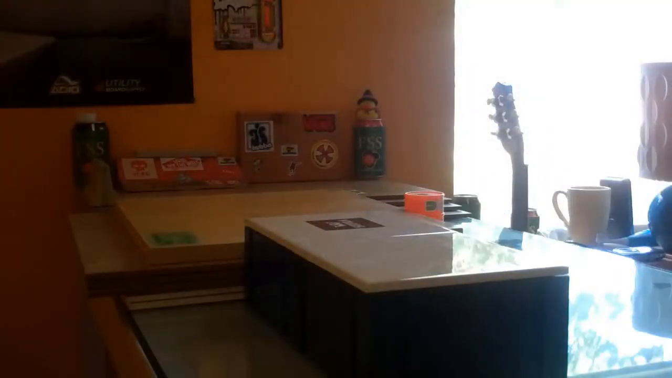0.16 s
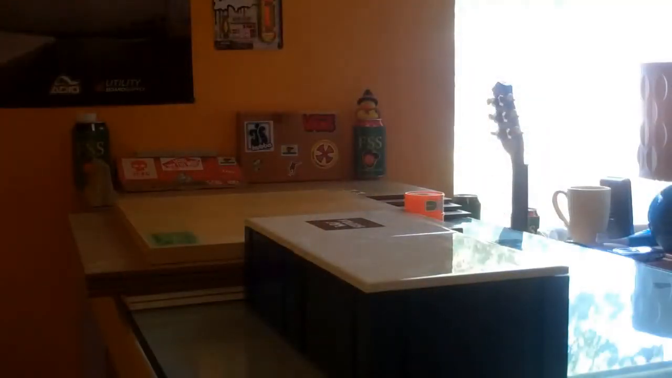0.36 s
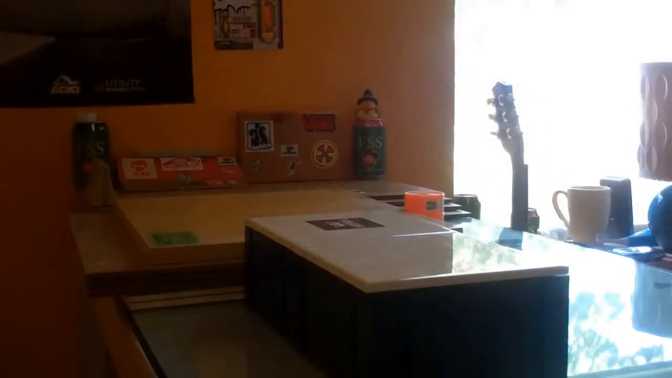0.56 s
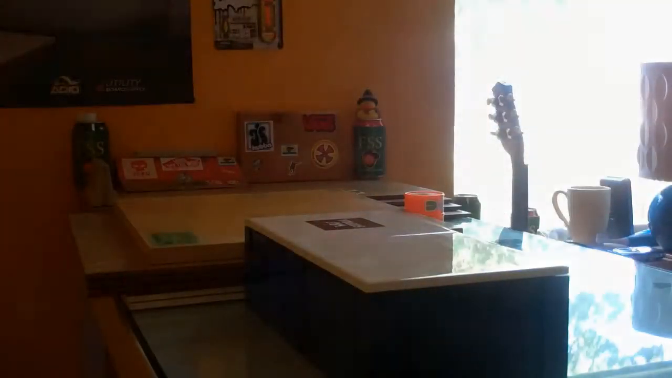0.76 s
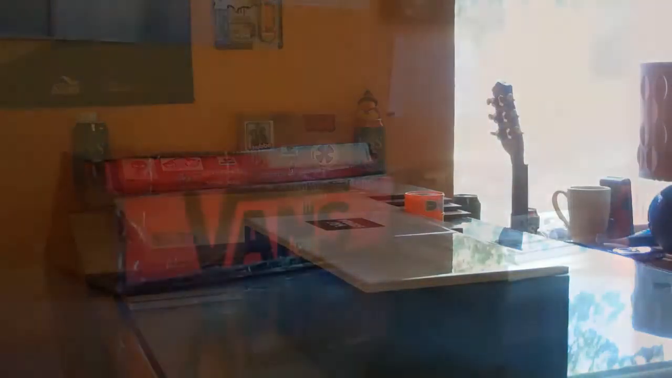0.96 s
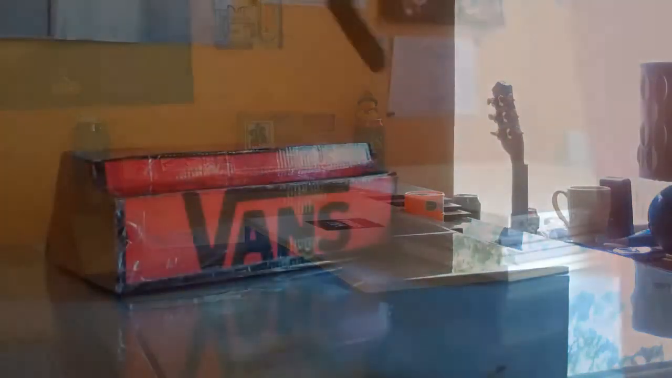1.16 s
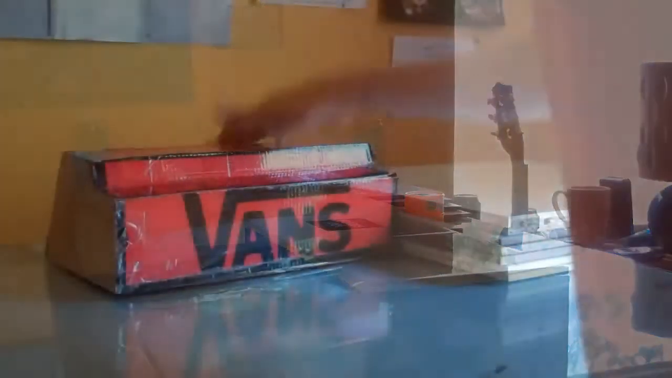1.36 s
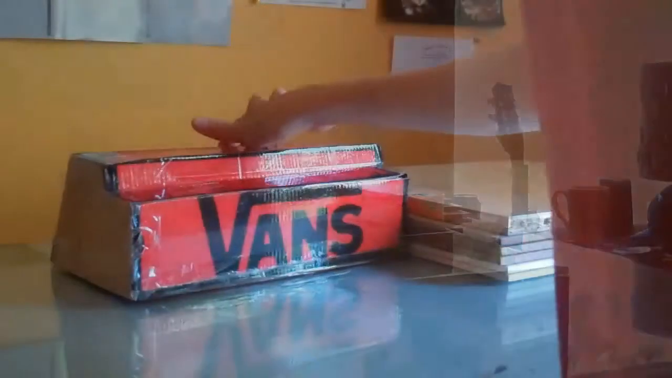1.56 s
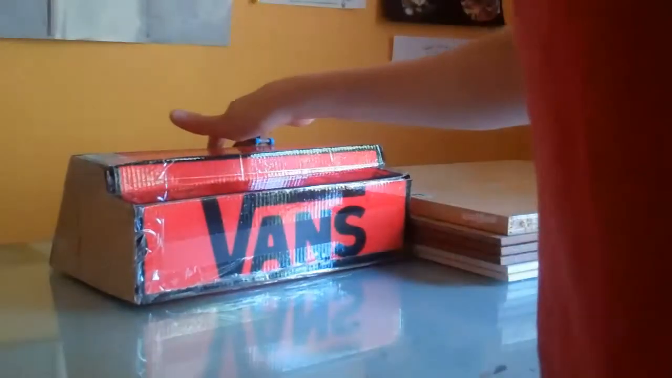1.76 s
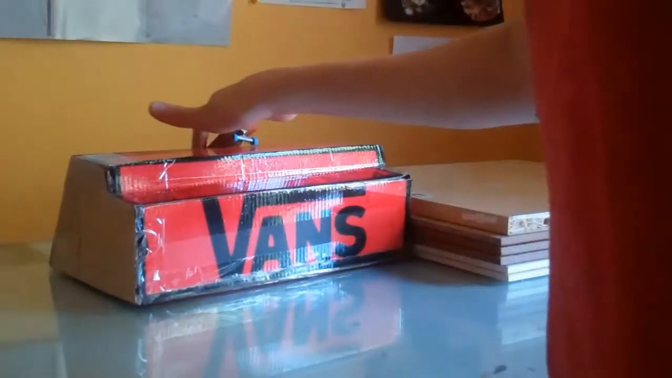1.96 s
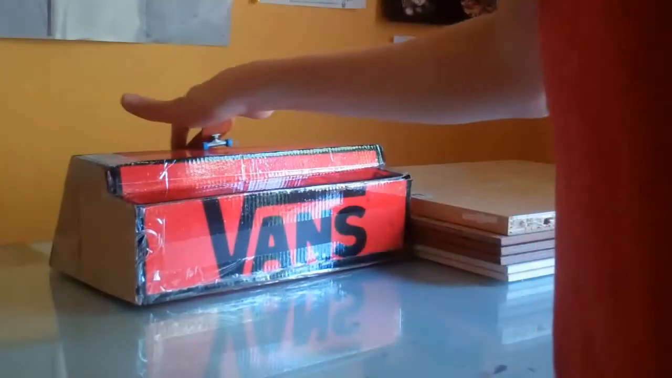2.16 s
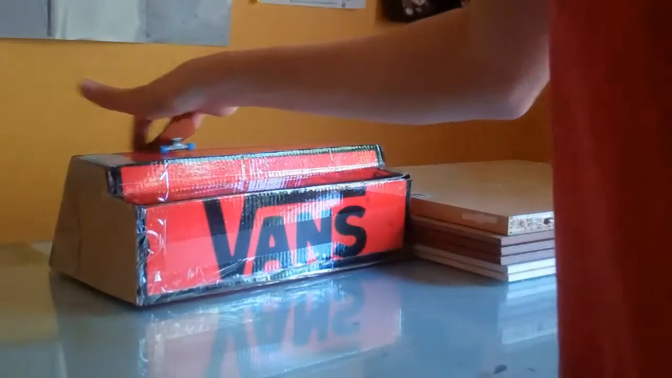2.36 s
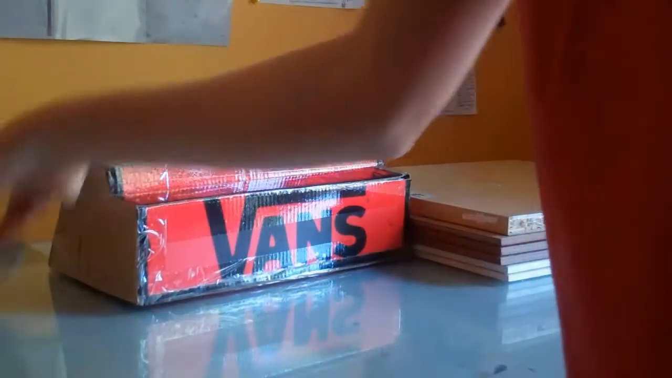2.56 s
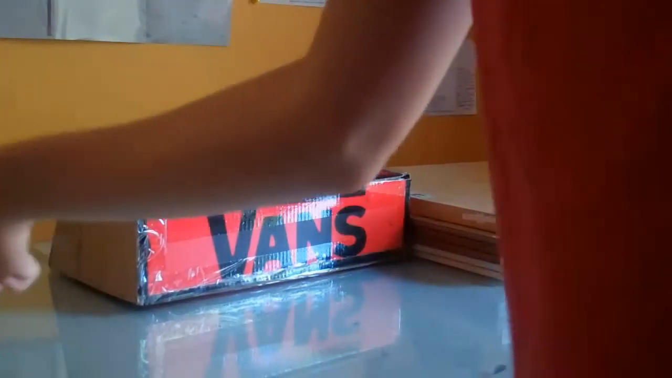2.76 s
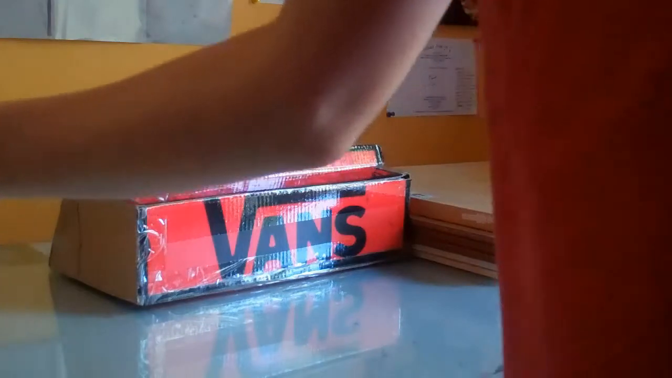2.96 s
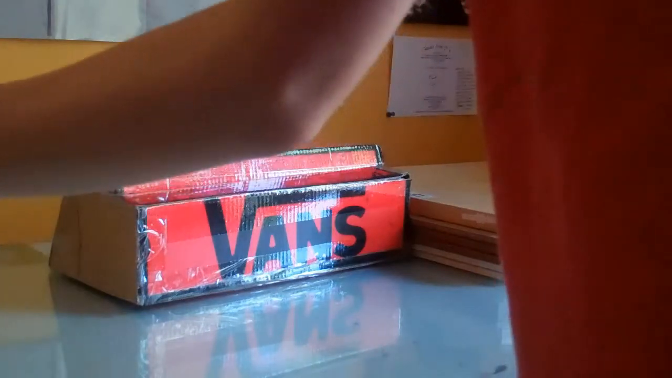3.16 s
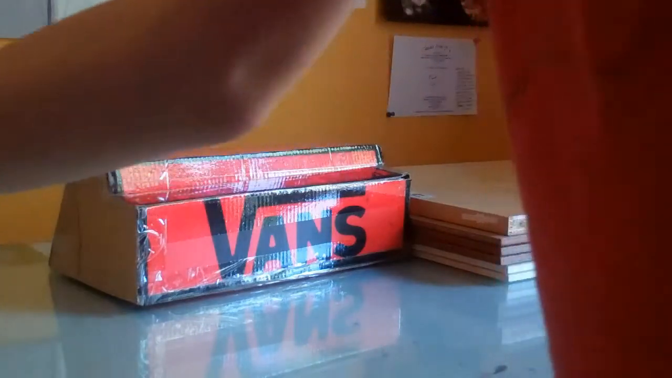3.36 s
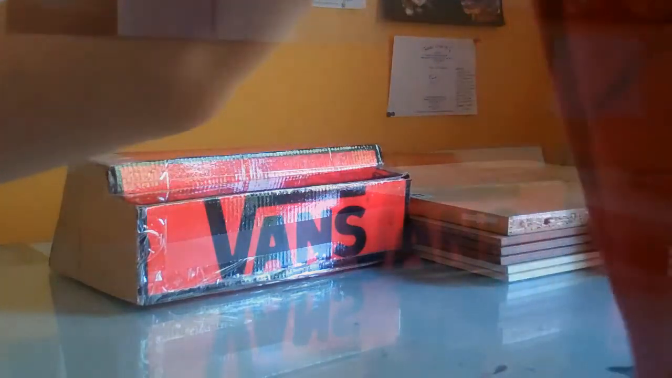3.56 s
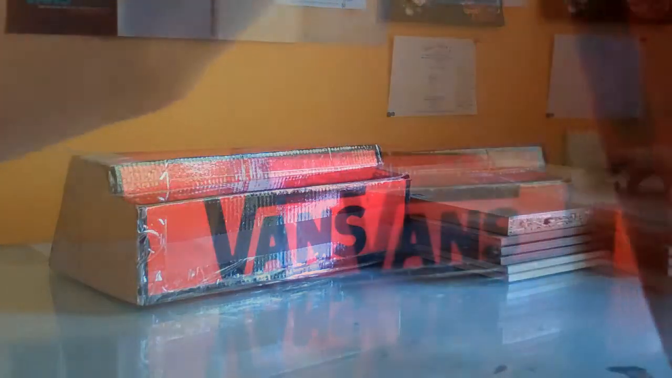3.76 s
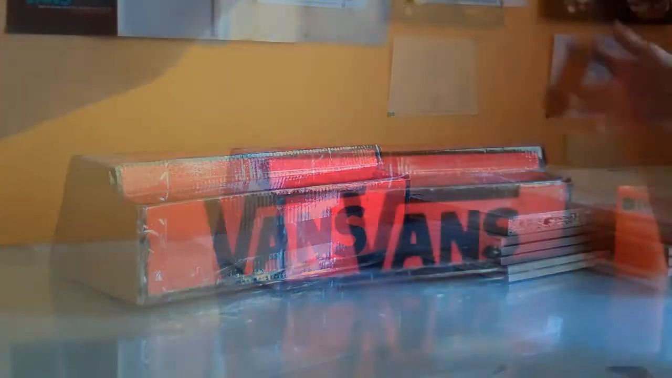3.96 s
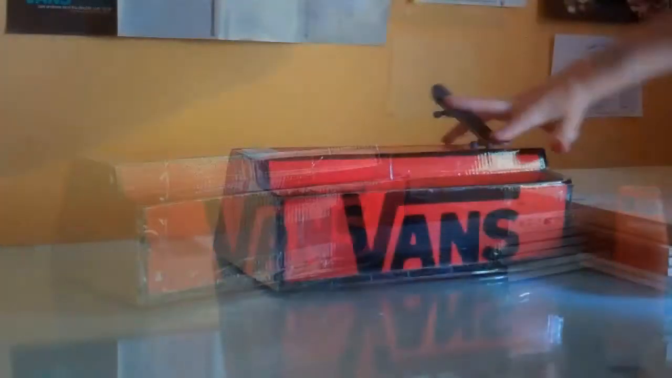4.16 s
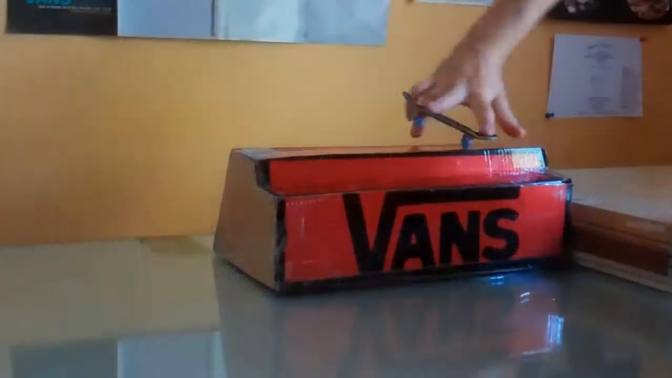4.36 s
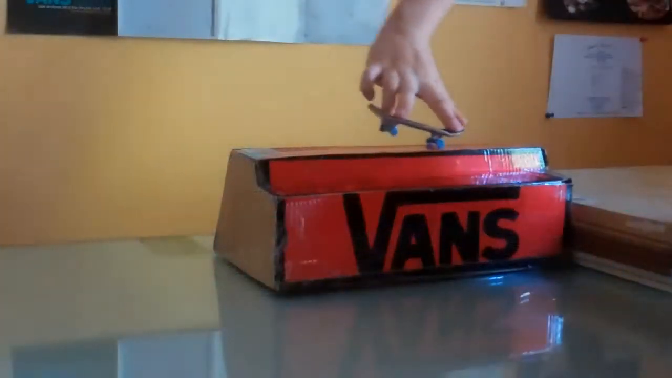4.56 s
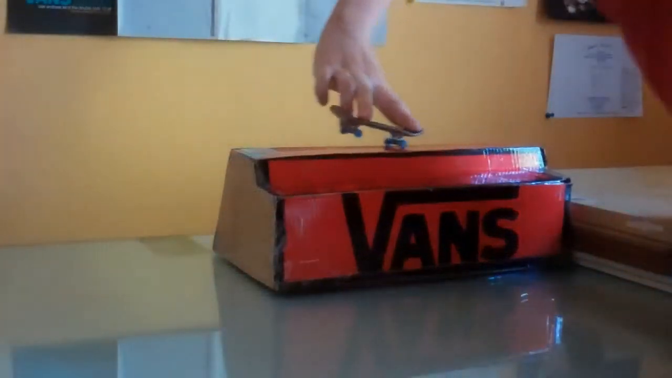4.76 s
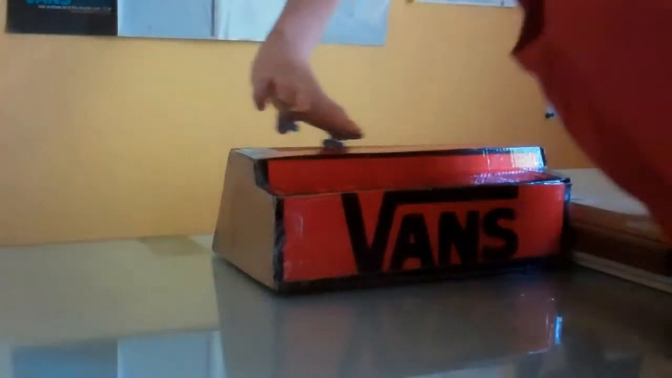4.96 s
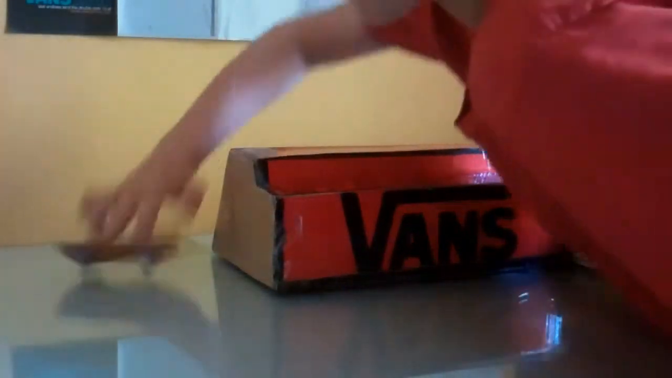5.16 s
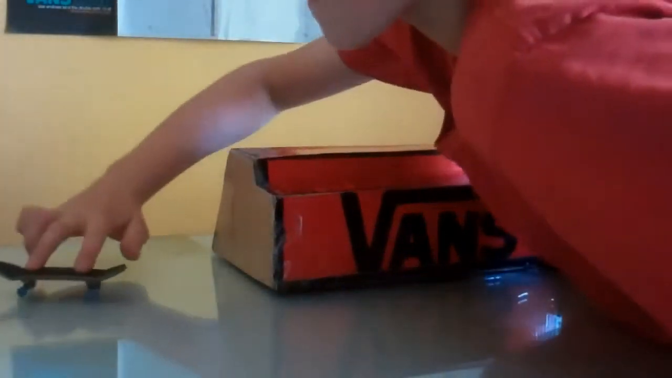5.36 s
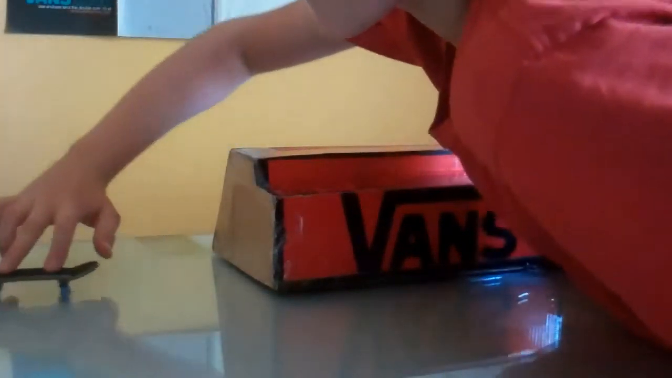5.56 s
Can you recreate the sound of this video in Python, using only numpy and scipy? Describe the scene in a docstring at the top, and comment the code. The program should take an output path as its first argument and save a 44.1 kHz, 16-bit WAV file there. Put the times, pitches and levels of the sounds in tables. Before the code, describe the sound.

Over soft room hiss and a faint thin whine, tiny wheels tick, grind and skid. Hollow knocks on a cardboard box lead to a bright clack on a glass table and a whirring roll. A second box ride swells into a rough scrape and a louder final drop; the sound briefly ducks after both drops. Close stereo microphone, short room reflections.

```python
"""A fingerboard is ridden over a taped cardboard box on a glass-topped table, close to a two-port microphone.
Under room hiss, a thin whine and soft rumbles it first clicks and rolls, then grinds and skids; from 1.4 s
it lands with hollow knocks on the box, slides over tape and scrapes the edge. At 2.65 s it clacks brightly
onto the glass and rolls on; from 4.15 s it is back on the box and at 5.2 s it drops again. The level sinks
briefly after both drops. Knocks ring filters and box modes; rubbing is shaped noise swelling in strokes."""
import sys
import numpy as np
from scipy import signal
from scipy.fft import rfft, irfft, next_fast_len
from scipy.io import wavfile

SR = 44100
rng = np.random.default_rng(int(sys.argv[2]) if len(sys.argv) > 2 else 0)


def pcm_store(signal):
    """Save signal as 16-bit PCM."""
    levels = np.round(np.clip(np.atleast_2d(signal), -1, 1) * 32767)
    wavfile.write(sys.argv[1], SR, levels.astype(np.int16).T)


N = 246959
TIME = np.arange(N) / SR


def from_db(db):
    """Decibels to gain."""
    return 10 ** (np.asarray(db) / 20)


def rms_one(x):
    """Scale to unit rms."""
    return x / np.sqrt(np.mean(x ** 2) + 1e-20)


def level(rows):
    """Gain over time from rows of (time [s], level [dB])."""
    return from_db(np.interp(TIME, *np.transpose(rows)))


def at_hz(points, hz):
    """Read a table on a log-frequency axis."""
    f, value = np.transpose(points)
    return np.interp(np.log(hz + 1), np.log(f), value)


def bins(x):
    """Frequencies of the spectrum of x."""
    return np.fft.rfftfreq(x.shape[-1], 1 / SR)


def add(out, s, sound):
    """Mix a sound in at a given time."""
    start = round(s * SR)
    out[:, start:start + sound.shape[-1]] += sound


def coloured(x, spectrum, peaks=()):
    """Pass two unrelated signals through a body with resonances, and on to the two microphone ports."""
    # how alike the two ports hear: (frequency [Hz], left-right correlation [0-1])
    port_likeness = [(50, 0.44), (400, 0.64), (1200, 0.73), (2500, 0.53), (5000, 0.15), (9000, 0.079),
                     (14000, 0.17)]
    hz = bins(x)
    ring = sum(from_db(db) ** 2 / (1 + (2 * (hz - f) / width) ** 2) for f, width, db in peaks)
    mid, side = rfft(x) * from_db(at_hz(spectrum, hz)) * np.sqrt(1 + ring)
    alike = np.clip(at_hz(port_likeness, hz), 0, .995)
    ports = np.sqrt(1 + alike) * mid + np.sqrt(1 - alike) * side * [[1], [-1]]
    return rms_one(irfft(ports, x.shape[-1]))


def noise(spectrum, size):
    """Smooth stereo noise of a given colour."""
    return coloured(rng.standard_normal((2, next_fast_len(size))), spectrum)[:, :size]


def strokes(rows):
    """Gain over time of strokes that swell and die away by one law; powers add where they overlap."""
    roundness = 1.31   # 1 is a pointed peak, 2 a bell
    power = 0
    for s, db, rise_s, fall_s in rows:
        # rise and fall are the times to 20 dB below the peak
        away = np.abs(TIME - s) / np.where(TIME < s, rise_s, fall_s)
        stroke_db = db - 20 * np.minimum(away, 10) ** roundness
        power = power + from_db(stroke_db) ** 2
    return np.sqrt(power)


def hiss_and_whine():
    """Room hiss that rises and falls, and a thin sine whine whose level follows it."""
    # rise and fall of the hiss: (time [s], level [dB])
    hiss_level = [(0, -59.5), (1, -57), (1.6, -64.5), (2.1, -59), (2.7, -69), (3.9, -62), (4.6, -72.5),
                  (5.6, -63)]
    # colour of the hiss: (frequency [Hz], relative density [dB])
    hiss_colour = [(15, -33), (25, -33), (65, -4), (301, -5.5), (382, -5.5), (1050, -7), (1820, -9.5),
                   (2030, -10), (2310, -7.5), (7030, -13.5), (7820, -16.5), (11600, -24.5), (14000, -60)]
    whine_hz, loudest_whine_db = 7900, -77   # rms level where the hiss is loudest
    hiss_gain = level(hiss_level)
    whine = from_db(loudest_whine_db) * np.sqrt(2) * np.sin(2 * np.pi * whine_hz * TIME)
    return hiss_gain * noise(hiss_colour, size=N) + hiss_gain / hiss_gain.max() * whine


def rumble():
    """Low noise on a steady floor, with a few soft swells."""
    # soft low rumbles: (peak time [s], level [dB], rise [s], fall [s])
    rumble_swells = [(.64, -60, .07, 0.17), (1.25, -54, 0.085, 0.08), (1.35, -58, 0.051, .09)]
    # colour of the rumble: (frequency [Hz], relative density [dB])
    rumble_colour = [(18, -23), (28, -9), (38, 3), (55, -11.5), (75, -9.5), (110, -20.5), (250, -40),
                     (2000, -110)]
    floor_db = -77
    return (strokes(rumble_swells) + from_db(floor_db)) * noise(rumble_colour, size=N)


def knock(t, hz, spread, skirt_db):
    """The contact itself: a band-passed click swings once or twice, on a faint low-passed push."""
    reach = 1 + abs(spread)
    edges = [hz / reach, min(hz * reach, .45 * SR)]
    click = (t == 0) + 1e-18
    swing = signal.sosfilt(signal.butter(2, edges, "band", fs=SR, output="sos"), click)
    push = signal.sosfilt(signal.butter(2, edges[0], fs=SR, output="sos"), click)
    return swing / np.abs(swing).max() + from_db(skirt_db) * push / push.max()


def crack(t, t60_s):
    """Deck and trucks rattle for a moment in their own resonances."""
    # broad colour of the crack: (frequency [Hz], relative density [dB])
    crack_colour = [(900, -19), (2000, -8), (3200, 0), (5000, 6), (8000, 2), (11000, -3.5), (15000, -30)]
    # resonances of deck and trucks: (frequency [Hz], width [Hz], level above the broad crack [dB])
    deck_peaks = [(2670, 140, 11.5), (3260, 180, 9), (4160, 197, 4), (5210, 380, 7), (6010, 400, 2),
                  (7440, 430, 0.5)]
    rattle = coloured(rng.standard_normal((2, len(t))), crack_colour, deck_peaks)
    return rattle * from_db(-60 * t / t60_s)


def strike_time():
    """Time axis of one strike, about a fifth of a second."""
    return np.arange(next_fast_len(SR // 5)) / SR


def clacks():
    """Deck and trucks click without waking the box: a knock and a crack."""
    # (time [s], knock level [dB], knock centre [Hz], crack level at its start [dB])
    clack_rows = [(.091, -32, 6200, -36), (1.057, -30, 8890, -40), (2.096, -41, 1800, -30.5),
                  (2.1392, -34, 4750, -34.5), (2.231, -58, 4870, -47), (2.6378, -30, 4500, -20),
                  (2.648, -19.5, 5600, -25.5), (2.659, -26, 4160, -35), (3.848, -23, 10000, -42),
                  (4.178, -27, 2500, -35.5), (5.177, -31.5, 7600, -34.5), (5.2163, -5, 2800, -25),
                  (5.2274, -31, 2700, -28)]
    t = strike_time()
    out = np.zeros((2, N + len(t)))
    for s, db, hz, crack_db in clack_rows:
        add(out, s, from_db(db) * knock(t, hz, spread=0.56, skirt_db=-9.5))
        add(out, s, from_db(crack_db) * crack(t, t60_s=0.02))
    return out[:, :N]


def room(x):
    """Quick reflections off table and wall, then the short tail of the room: decaying noise as an echo."""
    # colour of the reflections: (frequency [Hz], relative density [dB])
    room_colour = [(100, -30), (300, -12), (700, -2.5), (1500, 0), (3500, -1.5), (7000, 0.5), (14000, 1)]
    early_t60_s, tail_t60_s = 0.078, 0.45
    each_db = -2   # early and tail parts alike, ahead of the halving below
    t = np.arange(SR // 2) / SR
    arrived = t > .002
    envelope = sum(from_db(each_db) * rms_one(arrived * from_db(-60 * t / t60))
                   for t60 in (early_t60_s, tail_t60_s))
    response = noise(room_colour, size=len(t)) * envelope / np.sqrt(len(t))
    return signal.fftconvolve(x.mean(axis=0)[None], response / 2, axes=1)[:, :N]


def friction(spectrum, peaks, bumps_per_s, bump_db, judder_hz, judder_db):
    """Fine rubbing plus tiny bumps of uneven size, all juddering with the finger pressure."""
    size = next_fast_len(N)
    struck = rng.random(size) < bumps_per_s / SR
    bumps = rms_one(struck * rng.uniform(-1.07, 1, (2, size)))
    force = rng.standard_normal((2, size)) + from_db(bump_db) * bumps
    # the pressure wanders between new random points, up to twice judder_db either way
    pressure = np.interp(np.arange(size) / SR * judder_hz, np.arange(4000), rng.uniform(-2, 2, 4000))
    return coloured(force * from_db(judder_db * pressure), spectrum, peaks)[:, :N]


def rolling():
    """Free rolling on the glass: bumpy friction through the resonances of wheels and deck."""
    # (peak time [s], level [dB], rise [s], fall [s])
    roll_strokes = [(.11, -48, 0.044, 0.12), (.22, -52, .08, 0.1), (2.89, -50.5, 0.17, 0.16),
                    (3.03, -47.5, 0.14, 0.12), (3.34, -42, 0.38, 0.41), (3.78, -47, 0.31, 0.14),
                    (4.24, -47.5, 0.25, 0.22), (5.25, -45.5, 0.29, .16), (5.6, -60.5, 0.41, .1)]
    # broad colour: (frequency [Hz], relative density [dB])
    roll_colour = [(100, -22), (350, -17), (600, -11), (1000, -9.5), (1400, -4.5), (2400, -11),
                   (3500, -5.5), (4300, -10.5), (10000, -15.5), (14000, -39)]
    # wheels and deck on the glass: (frequency [Hz], width [Hz], level above the broad noise [dB])
    roll_peaks = [(1005, 165, 3), (3476, 50, 9), (3620, 42, 6), (3730, 45, 10.5), (5540, 500, 4)]
    return strokes(roll_strokes) * friction(roll_colour, roll_peaks, bumps_per_s=640, bump_db=-2.0,
                                            judder_hz=80.6, judder_db=1.4)


def table_echoes(x):
    """Close echoes ripple the spectrum of the riding noise."""
    # reflections off glass, books and wall: (delay [s], level [dB])
    close_echoes = [(.0047, -22.5), (.0083, -13), (0.0127, -16), (0.019, -16), (0.0295, -18)]
    echoes = 0
    for delay_s, db in close_echoes:
        late = np.pad(x, [(0, 0), (round(delay_s * SR), 0)])[:, :N]
        echoes = echoes + from_db(db) * late
    return x + echoes


def whirr(width_hz):
    """On the straight runs a narrow, unsteady wheel resonance: a tone modulated by slow noise."""
    # (peak time [s], level [dB], rise [s], fall [s])
    whirr_strokes = [(.13, -61.5, 0.046, 0.098), (3.05, -52.5, 0.16, 0.46), (3.4, -48, 0.46, 0.23)]
    whirr_hz = 1135
    slow = signal.butter(2, width_hz / 2, fs=SR, output="sos")
    flutter = signal.sosfilt(slow, rng.standard_normal((2, N)))
    phase = 2 * np.pi * whirr_hz * TIME
    tone = flutter[0] * np.cos(phase) + flutter[1] * np.sin(phase)
    return strokes(whirr_strokes) * rms_one(tone)


def grinding():
    """Wheels grind over the box: friction through the resonances of the box under them."""
    # (peak time [s], level [dB], rise [s], fall [s])
    grind_strokes = [(.61, -54, 0.087, 0.081), (.75, -57.5, 0.063, 0.16), (1.41, -39.5, 0.024, 0.086),
                     (1.72, -57, 0.12, 0.11), (1.91, -49.5, 0.22, 0.24), (2.16, -54.5, 0.077, 0.13),
                     (2.5, -45.5, 0.34, .07), (4.19, -52, 0.037, 0.09), (4.57, -51.5, 0.23, 0.38),
                     (5.11, -41, 0.52, 0.14)]
    # broad colour: (frequency [Hz], relative density [dB])
    grind_colour = [(47, -51.5), (80, -11.5), (198, -10), (305, -8.5), (572, -3.5), (637, -2), (791, -3.5),
                    (981, -3.5), (1390, -5.5), (1610, -4.5), (3670, -11), (7810, -17.5), (10800, -22.5),
                    (14000, -38)]
    # box under the wheels: (frequency [Hz], width [Hz], level above the broad noise [dB])
    grind_peaks = [(295, 30, 8.5), (432, 80, 3.5), (630, 50, -4.5), (780, 74, -3)]
    return strokes(grind_strokes) * friction(grind_colour, grind_peaks, bumps_per_s=400, bump_db=-6.0,
                                             judder_hz=58.03, judder_db=1.5)


def skidding():
    """Wheels skid sideways in quick turns: dense small bumps and a strong judder."""
    # (peak time [s], level [dB], rise [s], fall [s])
    skid_strokes = [(.97, -44, 0.044, 0.09), (3.73, -40, 0.083, 0.13)]
    # broad colour: (frequency [Hz], relative density [dB])
    skid_colour = [(120, -53), (200, -17.5), (581, -26), (875, -3), (1320, -9), (1950, -1), (2370, -9),
                   (3560, -3.5), (4250, -7), (9300, -12.5), (11500, -24), (14000, -51)]
    # wheels and deck on the glass: (frequency [Hz], width [Hz], level above the broad noise [dB])
    skid_peaks = [(950, 39, 6), (1285, 56, 13), (1890, 50, -0.5), (2736, 110, 8), (3270, 260, 1.5),
                  (5770, 520, 2.5)]
    return strokes(skid_strokes) * friction(skid_colour, skid_peaks, bumps_per_s=2800, bump_db=-10,
                                            judder_hz=63.4, judder_db=3.9)


def box_ring(t, boom_hz, fall_db_per_octave):
    """Each blow wakes most the box modes near its boom centre, with new strengths every time."""
    # modes of the hollow box: (frequency [Hz], relative strength [dB], t60 [s])
    box_modes = [(155.3, -14, 0.23), (230.4, -10, 0.18), (270, -18.5, 0.22), (378, 1.5, 0.073),
                 (453, 8.5, 0.029), (486, -4.5, 0.09), (552, -9, 0.17), (667, 6, 0.033), (723, 0.5, 0.055),
                 (766, -15, 0.18), (888, -3.5, 0.051), (1058, 0.5, 0.042), (1144, -22, 0.084),
                 (1350, -9, 0.078), (1590, -29, 0.18), (1684, -3, 0.047), (1780, -27, 0.06),
                 (2275, -18, .09), (2500, -15.5, 0.11)]
    hz, db, t60 = np.transpose(box_modes)[:, :, None]
    woken_db = db - fall_db_per_octave * np.abs(np.log2(hz / min(boom_hz, hz.max())))
    strength = from_db(woken_db + 1.13 * rng.standard_normal(hz.shape))
    swings = np.sin(2 * np.pi * (hz * t + rng.random(hz.shape)))
    build_up = 1 - np.exp(-t * hz / 2)   # the panels take a couple of cycles to get going
    return np.sum(strength * swings * build_up * from_db(-60 * t / t60), axis=0) / 2


def landings():
    """Wheels and deck land on the box: a knock, a crack of the deck and the boom of the box."""
    # each spot has a note of its own:
    # (time [s], knock level [dB], knock centre [Hz], relative boom drive [dB], boom centre [Hz])
    landing_rows = [(1.3837, -19.5, 1420, -29.5, 970), (1.4097, -24, 420, -31, 480),
                    (1.4163, -26, 1790, -38.5, 900), (1.447, -36, 636, -37, 590),
                    (1.695, -61, 435, -44, 420), (2.101, -13.5, 1530, -27.5, 221),
                    (2.4713, -13.5, 1220, -25.5, 990), (2.5, -18.5, 1210, -28, 1300),
                    (4.1543, -16.5, 865, -24.5, 380), (4.168, -27, 880, -31.5, 950),
                    (4.848, -25.5, 1450, -39, 1610), (5.1, -21, 464, -20, 430)]
    # crack level at a medium knock, and the share of the knock's swing in dB that it follows
    medium_crack_db, medium_knock_db, crack_follows = -29.5, -24, 0.32
    box_db = 4.5   # how strongly the box answers a landing
    t = strike_time()
    out = np.zeros((2, N + len(t)))
    for s, db, hz, boom_db, boom_hz in landing_rows:
        crack_db = medium_crack_db + crack_follows * (db - medium_knock_db)
        add(out, s, from_db(db) * knock(t, hz, spread=0.53, skirt_db=-19.5))
        add(out, s, from_db(crack_db) * crack(t, t60_s=0.017))
        add(out, s, from_db(boom_db + box_db) * box_ring(t, boom_hz, fall_db_per_octave=6.0))
    return out[:, :N]


def sliding():
    """The deck slides on smooth tape: bright friction."""
    # (peak time [s], level [dB], rise [s], fall [s])
    slide_strokes = [(1.885, -48.5, 0.17, 0.12), (2.43, -52.5, .1, 0.14), (4.52, -60.5, .25, 0.47),
                     (5.11, -43.5, 0.13, 0.29), (5.27, -46, 0.083, 0.11)]
    # broad colour: (frequency [Hz], relative density [dB])
    slide_colour = [(500, -47.5), (2500, -19.5), (4200, -2.5), (5400, 3), (6500, 1.5), (8500, 0),
                    (11000, -10), (13500, -41.5)]
    # deck on the tape: (frequency [Hz], width [Hz], level above the broad noise [dB])
    slide_peaks = [(5200, 510, 5.5), (5900, 500, 2.5)]
    return strokes(slide_strokes) * friction(slide_colour, slide_peaks, bumps_per_s=940, bump_db=-1,
                                             judder_hz=92.0, judder_db=1.3)


def scraping():
    """A truck scrapes along the edge of the box: juddering friction with narrow resonances."""
    # (peak time [s], level [dB], rise [s], fall [s])
    scrape_strokes = [(2.105, -37.5, 0.011, 0.066), (2.505, -44, .008, 0.052), (4.78, -51, 0.16, 0.11),
                      (4.852, -39.5, .012, 0.093), (5.08, -36, 0.16, 0.12)]
    # broad colour: (frequency [Hz], relative density [dB])
    scrape_colour = [(500, -42), (1000, 1.5), (1600, -0.5), (2600, -2.5), (4000, -12), (9000, -17.5),
                     (14000, -35)]
    # resonances: (frequency [Hz], width [Hz], level above the broad noise [dB])
    scrape_peaks = [(1073, 50, 6.6), (1190, 110, 4.9), (1260, 46, 7.2), (1530, 79, 4.7), (1990, 24, 2.6)]
    return strokes(scrape_strokes) * friction(scrape_colour, scrape_peaks, bumps_per_s=900, bump_db=-5.5,
                                              judder_hz=80.55, judder_db=3.5)


def dips():
    """Gain over time: the whole sound sinks briefly after each drop to the glass, in a smooth bell."""
    # (deepest time [s], level [dB], time to 1/e of the depth in dB [s])
    dip_rows = [(2.776, -13, 0.082), (5.379, -14.5, 0.1)]
    return from_db(sum(db * np.exp(-((TIME - s) / width_s) ** 2) for s, db, width_s in dip_rows))


def scene():
    """Strikes in the room over the riding noise and the background."""
    background = hiss_and_whine() + rumble()
    hits = clacks() + landings()
    riding = table_echoes(rolling() + grinding() + skidding() + sliding() + scraping())
    return dips() * (background + hits + room(hits) + riding + whirr(width_hz=76))


def record(dry):
    """The left port hears more up to about 12 kHz; the top rolls off and is cut."""
    # balance of the ports: (frequency [Hz], left minus right [dB])
    port_balance = [(100, 2), (500, 2), (2500, 3), (4500, 3), (8000, 8), (10500, 9.5), (13000, -4)]
    size = next_fast_len(N)
    spectrum = rfft(dry, size)
    hz = np.fft.rfftfreq(size, 1 / SR)
    lean_db = at_hz(port_balance, hz) / 2 * np.array([[1], [-1]])
    top_db = at_hz([(9000, -2.5), (11000, -4.5), (13000, -7.0), (15000, -25)], hz)
    heard = irfft(spectrum * from_db(lean_db + top_db), size)[:, :N]
    # 60 dB down from 16 kHz upward
    return signal.sosfilt(signal.cheby2(14, 60, 16000, fs=SR, output="sos"), heard)


dry = scene()
out = record(dry)
pcm_store(out)
```